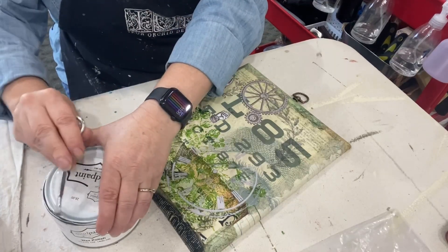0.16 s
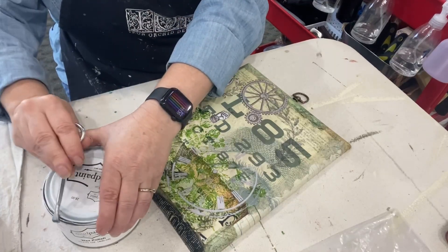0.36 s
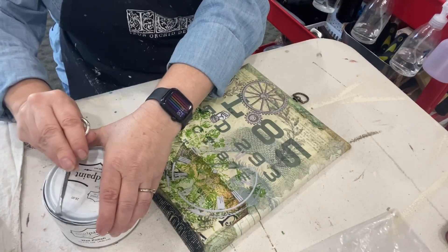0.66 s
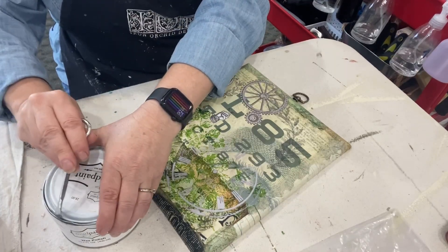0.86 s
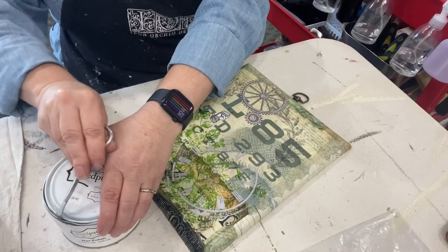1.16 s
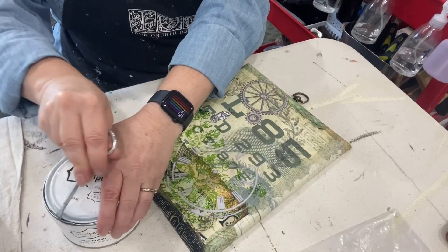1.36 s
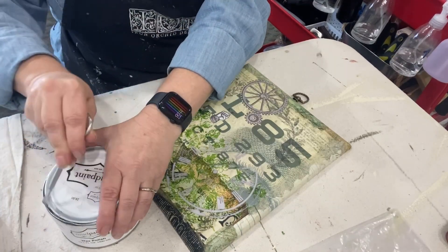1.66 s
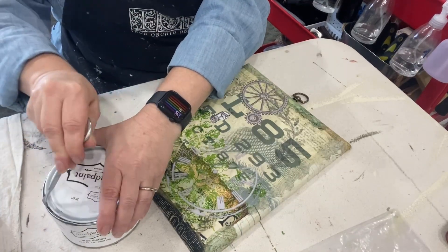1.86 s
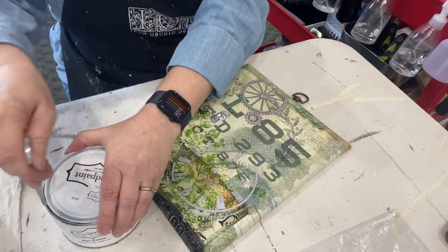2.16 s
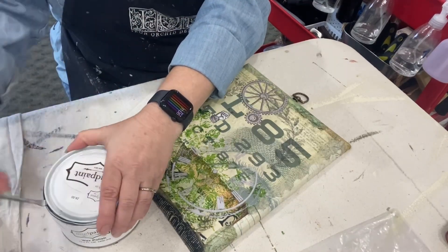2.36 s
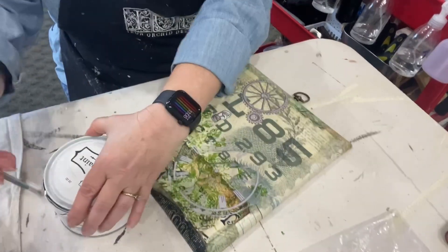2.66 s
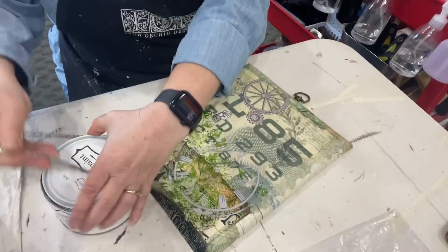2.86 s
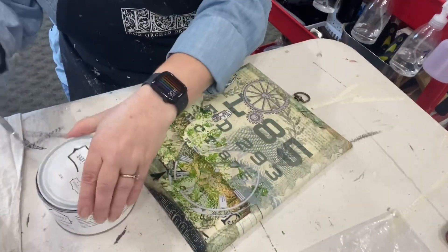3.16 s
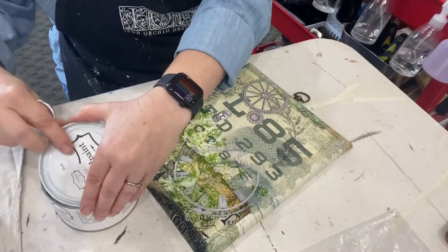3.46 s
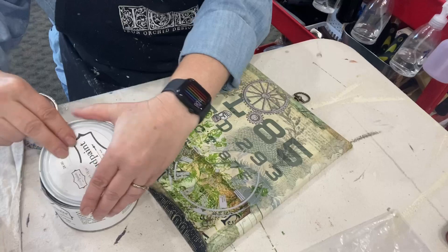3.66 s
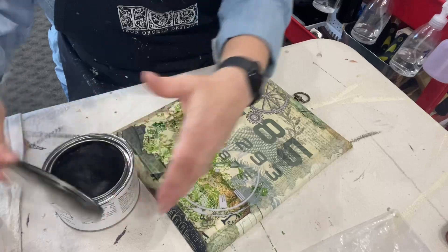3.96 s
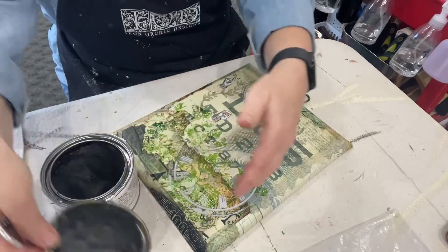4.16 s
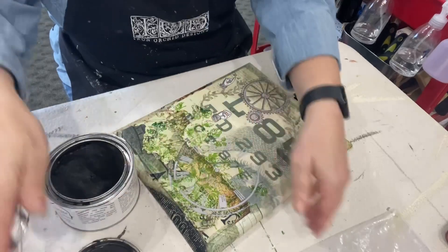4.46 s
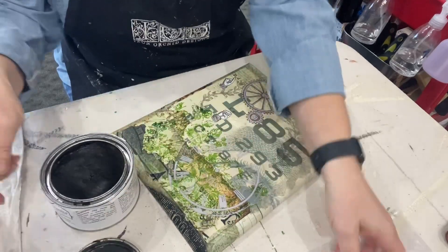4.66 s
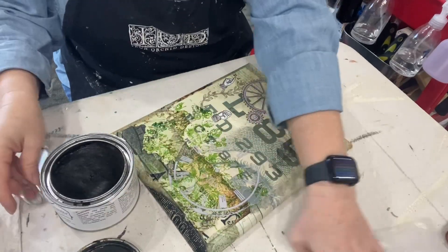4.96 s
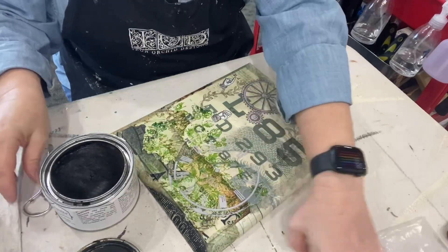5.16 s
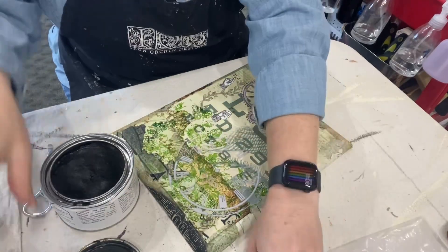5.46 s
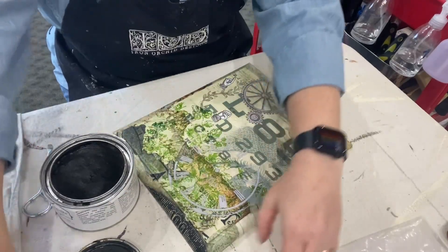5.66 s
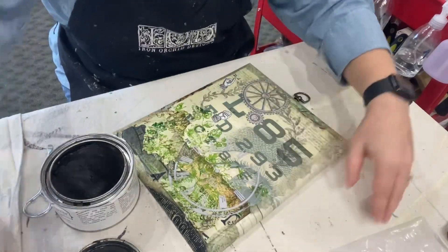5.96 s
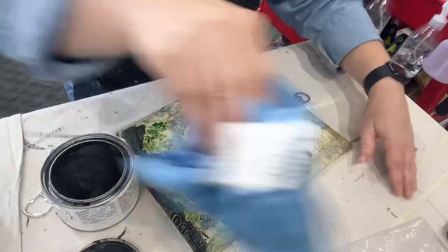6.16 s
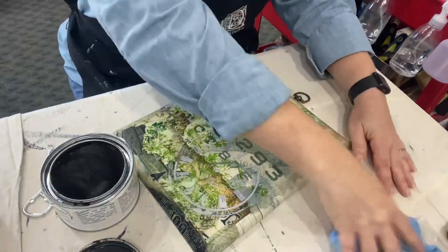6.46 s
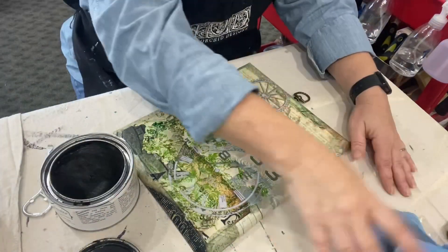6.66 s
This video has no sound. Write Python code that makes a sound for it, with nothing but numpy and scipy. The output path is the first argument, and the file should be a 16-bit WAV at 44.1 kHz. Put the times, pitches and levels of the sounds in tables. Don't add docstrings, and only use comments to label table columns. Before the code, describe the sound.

Light metallic knocks on a filled can, a hard levering pop, heavy set-downs on a tabletop, then faint bag crackle and a soft cloth thump.

```python
import sys
import numpy as np
from scipy import signal
from scipy.fft import rfft, irfft
from scipy.io import wavfile
from scipy.ndimage import uniform_filter1d

SR = 44100
rng = np.random.default_rng(int(sys.argv[2]) if len(sys.argv) > 2 else 0)


def dump(signal):
    limited = np.clip(np.atleast_2d(signal).T, -1, 1)
    pcm = np.round(limited * 32767).astype(np.int16)
    wavfile.write(sys.argv[1], SR, pcm)


def volts_from_decibels(level):
    exponent = np.asarray(level, float) / 20
    return 10 ** exponent


N = 299880


def unit(x):
    return x / np.sqrt(np.mean(x ** 2))


def peak(x, db):
    return x * volts_from_decibels(db) / np.max(np.abs(x))


def add(out, x, s):
    i = int(s * SR)
    out[..., i:i + x.shape[-1]] += x[..., :N - i]


def colour(x, shape):
    hz, db = np.transpose(shape)
    f = np.log(np.maximum(np.arange(x.shape[-1] // 2 + 1) * SR / x.shape[-1], 1))
    outside = np.maximum(np.log(hz[0]) - f, 0) + np.maximum(f - np.log(hz[-1]), 0)
    return irfft(rfft(x) * volts_from_decibels(np.interp(f, np.log(hz), db) - 11.4 * outside), x.shape[-1])


def moved_to(centre_hz, shape):
    return [(share * centre_hz, db) for share, db in shape]


def walk(rate):
    hold = int(SR / rate)
    levels = np.repeat(rng.standard_normal(N // hold + 1), hold)
    return 1.5 * uniform_filter1d(uniform_filter1d(levels, hold), hold)[:N]


def swells(peaks, rise_db_s, fall_db_s):
    s, db = (np.array(c)[:, None] for c in peaks)
    age = np.arange(0, N, 100) / SR - s
    return volts_from_decibels(db + np.minimum(rise_db_s * age, -fall_db_s * age))


def as_db(gain):
    return np.interp(np.arange(N), np.arange(0, N, 100), 20 * np.log10(gain))


def slips(rate, scatter_db):
    clicks = (rng.random(N) < rate / SR) * rng.standard_normal(N)
    return unit(clicks * volts_from_decibels(scatter_db * np.minimum(rng.exponential(size=N), 3)))


MODE_SCATTER_DB = 3


def ring(modes, chance, rise_s, spread):
    hz, db, t60 = (c[:, None] for c in np.transpose(modes))
    share, start, detune = chance[:3 * len(modes)].reshape(3, -1, 1)
    t = np.arange(int(SR * min(.8 * t60.max(), .5))) / SR
    fall, turn = np.log(1000) / t60, 2 * np.pi * hz * (1 + spread * detune)
    fall, turn, start, age = map(np.float32, (fall, turn, start, t))
    each = np.exp(-fall * age) * np.sin(turn * age + start)
    mixed = volts_from_decibels(db + MODE_SCATTER_DB * share)[:, 0] @ each
    return mixed * (1 - np.exp(-t / rise_s)) * (1 - 2 * t)


# (frequency [Hz], level [dB per Hz])
AIR_COLOUR = [(150, 13), (400, -6), (600, -7.5), (1500, -15.5), (3000, -21.5), (6000, -28.5), (9000, -27),
              (16000, -44)]
AIR_DB = -71


def room_air():
    noise = rng.standard_normal(N) + volts_from_decibels(-2) * rng.standard_normal((2, N))
    return unit(colour(noise, AIR_COLOUR)) * volts_from_decibels(AIR_DB + 4.0)


# (frequency [Hz], level [dB], t60 [s])
ECHO_BANDS = [(63, -13, 0.56), (113, -17, 0.55), (234.7, -16.5, 0.62), (500, -13.5, 0.63), (1000, -12, .38),
              (2400, -15, .35), (4100, -16.5, 0.24), (8000, -24.5, 0.2), (14000, -23.5, 0.072)]


def echoes():
    t, tail = np.arange(16384) / SR, 0
    for hz, db, t60 in ECHO_BANDS:
        shared, *apart = rng.standard_normal((3, len(t)))
        alike = min(max(160 / hz, hz / 7000), .97)
        noise = np.sqrt(alike) * shared + np.sqrt(1 - alike) * np.array(apart)
        noise = colour(noise, [(hz / 2, -9), (hz, 0), (hz * 2, -9)])
        tail = tail + volts_from_decibels(db) * noise * np.exp(-np.log(1000) * t / t60)
    return tail * np.clip(t / 0.00092, 0, 1) * volts_from_decibels(-23)


def room(x, size=16384):
    out, x = np.zeros((2, N + size)), np.pad(x, size // 2)
    patterns = [echoes() for _ in range(7)]
    for i in range(0, N, size // 2):
        piece = x[i:i + size] * np.hanning(size)[:len(x) - i]
        pattern = patterns[2 * i // size % len(patterns)]
        wet = signal.fftconvolve(piece[None], pattern, axes=1)[:, :N + size - i]
        out[:, i:i + wet.shape[1]] += wet
    return out[:, size // 2:N + size // 2]


# (frequency [Hz], phase [rad])
PORT_LEAD = [(0, 0), (690, 1.4), (1980, .6), (2670, 1.6), (4300, 1.0), (5800, 4.7), (9300, 7.85),
             (15400, 15.7)]
# (frequency [Hz], left minus right [dB])
PORT_SHADE = [(60, -4.5), (125, 0.5), (250, -4), (500, -0.5), (1000, -1.5), (2400, -2), (4400, -8.5),
              (5500, -8.5), (7000, -0.5), (9000, 2)]
DWELL = .46


def ports(x):
    f = np.arange(N // 2 + 1) * SR / N
    turn = np.interp(f, *np.transpose(PORT_LEAD))
    shade = np.log(volts_from_decibels(np.interp(f, *np.transpose(PORT_SHADE))))
    lead = 1j * (turn - DWELL * np.sin(2 * turn)) + shade
    return irfft(rfft(x) * np.exp(np.array([lead, -lead]) / 2), N)


# (frequency [Hz], level [dB per Hz])
RUMBLE_COLOUR = [(12, -60), (20, -42), (39, -15.5), (65, 3), (145, -12), (177, -15), (311, -29), (400, -29),
                 (520, -59), (880, -120)]
# (time [s], level [dB])
LEANS = [(.68, -58.5), (1.549, -66.5), (2.0, -48), (2.461, -76), (2.649, -41.5), (3.159, -55), (3.479, -49),
         (3.9, -52), (4.979, -66), (5.47, -55.5), (5.792, -51), (6.48, -46)]
LEAN_RISE_DB_S, LEAN_FALL_DB_S, REST_DB = 76, 54, -66.5


def rumble():
    lean = swells(np.transpose(LEANS), LEAN_RISE_DB_S, LEAN_FALL_DB_S).sum(axis=0) + volts_from_decibels(REST_DB)
    noise = unit(colour(rng.standard_normal(N), RUMBLE_COLOUR))
    return noise * volts_from_decibels(as_db(lean) + 1.6 * walk(12))


# (frequency [Hz], level [dB per Hz])
HISS_COLOUR = [(1500, -5.5), (3000, -3.5), (5000, -6.5), (8000, -1), (11000, -2.5), (13500, -4.5),
               (15500, -11.5)]
SCRAPE_COLOUR = [(200, -10.5), (450, 14), (1000, 3), (2000, -11.5), (3500, -32)]
# (time [s], hiss [dB], scrape re hiss [dB])
STROKES = [(.24, -99, 24), (1.38, -90, 9.5), (2.48, -71, -0.5), (3.04, -77, 0), (3.26, -80, -9.5),
           (3.68, -78, 7.5), (4.1, -78, -7), (4.2, -81, -13), (4.28, -83, 0), (4.56, -69.5, -11),
           (4.96, -64.5, 4.5), (5.3, -90.5, 27.5), (5.47, -64.5, -4), (5.72, -75.5, -1.5),
           (5.889, -74, -4.5), (6.302, -68.5, -6.5), (6.569, -80.5, 6.5)]
STROKE_RISE_DB_S, STROKE_FALL_DB_S, STILL_DB = 84, 88.5, -104


def rustle():
    s, hiss_db, scrape_db = np.transpose(STROKES)
    strokes = swells((s, hiss_db), STROKE_RISE_DB_S, STROKE_FALL_DB_S)
    hiss_gain = strokes.sum(axis=0) + volts_from_decibels(STILL_DB)
    scrape_gain = volts_from_decibels(scrape_db) @ strokes + volts_from_decibels(STILL_DB)
    grit = rng.standard_normal(N) + volts_from_decibels(-2.0) * slips(1700, 3.2)
    hiss = unit(colour(grit, HISS_COLOUR)) * volts_from_decibels(5.5 + 1.3 * walk(27))
    scrape = unit(colour(grit, SCRAPE_COLOUR)) * volts_from_decibels(as_db(scrape_gain / hiss_gain) + 1.6 * walk(26))
    return volts_from_decibels(as_db(hiss_gain) + 0.97 * walk(2.2)) * (hiss + scrape)


# (time [s], level [dB], start [Hz], end [Hz], length [s])
SQUEAKS = [
    (2.77, -44, 720, 560, .13),
    (3.15, -48, 400, 720, .06),
    (1.602, -44, 1385, 1375, .04),
    (1.662, -51, 1350, 1340, .04),
    (2.525, -54, 1840, 1850, .03),
]


def squeaks():
    out = np.zeros(N)
    for s, db, start_hz, end_hz, length in SQUEAKS:
        u = np.arange(int(length * SR)) / (length * SR)
        cycles = length * (start_hz * u + (end_hz - start_hz) * u ** 2 / 2)
        add(out, volts_from_decibels(db) * np.sin(np.pi * u) * np.sin(2 * np.pi * cycles), s)
    return out * (0.6 + walk(140))


# (time [s], crack peak [dB], top edge re crack [dB], body re crack [dB], crack centre [Hz])
TICKS = [(1.061, -66, -5, -20, 1800), (3.115, -60, 0.5, -20, 2800), (3.7, -66, 6, -20, 3000),
         (4.5108, -61, 7.5, -20, 4000), (4.5422, -62, 8, -20, 4000), (4.6085, -46.5, -6, -20, 4000),
         (4.6774, -55, 2.5, -20, 4000), (4.7749, -64, 7.5, -20, 4000), (4.813, -62, 10, -20, 4000),
         (4.8455, -57, 0, -20, 4000), (4.8909, -50, 0, -20, 3000), (4.9057, -48, 4, -20, 3500),
         (5.139, -50, 6, -20, 3500), (5.44, -52.5, 5.5, -20, 3000), (5.47, -52, 6, -20, 3000),
         (5.8455, -62, 3, -20, 3000), (5.88, -60, 3, -20, 4000)]
TICK_S = .0015


def ticks():
    return contacts([(*row, TICK_S) for row in TICKS], BAG_MODES[-1:], -3) + squeaks()


# (share of the centre, level [dB per Hz])
CHATTER_COLOUR = [(.4, -6.5), (.8, -0.5), (1.0, 4.5), (1.25, -3.5), (2.199, -20.5)]
# (time [s], rms level [dB], centre [Hz], top edge re chatter [dB], length [s])
DRAGS = [(0.215, -65.5, 2080, -21.5, 0.14), (1.05, -70.5, 404, -29, 0.11), (1.536, -54.5, 2390, -11, 0.096),
         (1.575, -51, 2500, -6, .11), (2.427, -45, 560, -22, 0.23), (2.651, -48, 1800, -4.5, .07),
         (2.716, -56, 640, 0.5, .12), (3.144, -59, 590, -30, 0.061), (2.988, -70, 4040, 5.5, .09),
         (3.057, -72, 2800, 1.5, 0.11), (3.43, -62, 2560, 4, 0.06), (3.757, -65, 1410, -1, .08),
         (4.239, -33, 700, -27, 0.034), (4.504, -69, 4000, 6, .07), (4.829, -65, 3500, 4, .08),
         (4.931, -63, 3000, 7.5, .1), (4.571, -56.5, 2975, 3.5, .1), (4.88, -61, 3060, 6, 0.11),
         (4.992, -41, 500, -33.5, 0.18), (5.267, -55, 1000, -5, 0.075), (5.4, -64, 2250, 4, 0.13),
         (5.535, -64.5, 2000, 2.5, .1), (6.42, -38, 3260, -5, 0.049), (6.428, -53, 600, -13, 0.047)]
SLIP_SCATTER_DB = 3.2


def drags():
    out, t = np.zeros(N), np.arange(16384) / SR
    chatter = slips(800, SLIP_SCATTER_DB) + 0.89 * rng.standard_normal(N)
    chatter = chatter * volts_from_decibels(2.0 * walk(60))
    for s, db, hz, top_db, length in DRAGS:
        piece = np.resize(chatter[int(s * SR):], len(t))
        grip = np.clip(np.minimum(t / 0.027, (length - t) / (0.46 * length)), 0, 1)
        body = unit(colour(piece, moved_to(hz, CHATTER_COLOUR)))
        top = volts_from_decibels(top_db) * unit(colour(piece, EDGE_COLOUR))
        add(out, volts_from_decibels(db) * grip * (body + top), s)
    return out


HELD = [(.228, -38, 2180), (.641, -33.5, 2380), (1.56, -31, 950), (1.559, -26.5, 2460), (1.649, -25, 1370),
        (1.915, -31.5, 620), (1.914, -26, 1750), (1.915, -24.5, 2387), (2.737, -20.5, 633),
        (3.401, -27, 740), (4.332, -19, 1050), (.689, -34.5, 1210)]
MORE_HELD = [(.229, -43, 750), (.308, -43, 664), (.308, -44, 2210), (.5, -45, 610), (.533, -49, 2150),
             (.688, -37.5, 582), (.688, -39, 2300), (1.583, -39, 2400), (1.569, -38, 2400), (1.594, -40, 700),
             (1.585, -42, 950), (1.56, -36, 600), (1.655, -40, 1700), (2.423, -32, 430), (2.489, -32, 580),
             (2.493, -44, 1850), (4.974, -24, 430), (4.252, -27, 1357), (4.252, -22, 900), (4.334, -27, 340),
             (3.025, -46, 400), (2.95, -48, 600), (3.115, -54, 950), (3.16, -54, 1100), (3.702, -50, 800),
             (4.798, -46, 1050), (.232, -46, 1400), (.312, -46, 1150), (.503, -50, 2250), (2.741, -28, 700),
             (6.437, -40, 2250), (6.452, -44, 2100), (4.342, -36, 1400), (6.434, -38, 900), (6.44, -36, 320),
             (1.65, -35, 2880), (2.468, -38, 606), (2.47, -49, 1800), (2.498, -47, 1300), (2.528, -50, 1850),
             (2.535, -41, 480), (2.558, -46, 1300), (2.565, -42, 560), (2.578, -44.5, 1350), (2.605, -43, 540),
             (2.634, -54, 1850), (2.7, -42, 1200), (2.736, -26, 1910), (2.737, -31, 2480), (2.737, -30, 1400),
             (2.784, -36, 470), (2.836, -42, 2550), (2.836, -45, 1320), (2.836, -36, 550), (4.962, -38, 960),
             (5.041, -28, 1050), (5.055, -37, 1650), (5.073, -26, 760), (5.1, -39, 700), (5.124, -34, 620),
             (5.15, -42, 700), (5.216, -45, 1700), (5.281, -48, 1400), (5.296, -48, 1104), (5.306, -48, 1090)]
FREE = [
    (.69, -65, 630),
    (1.917, -41.5, 565),
    (1.916, -43.5, 2570),
    (2.74, -41, 572),
    (3.403, -63, 592.6),
    (3.403, -33, 593.5),
    (4.252, -28.5, 608),
    (4.251, -33, 1200),
]
SKIN = [(1.654, -62, 1337), (1.917, -48, 1806), (1.917, -53, 2050), (1.917, -51, 2300), (1.917, -48, 2530),
        (1.917, -55, 840), (1.917, -49, 1755), (1.917, -54, 1572), (1.917, -50, 2239), (1.917, -48, 2460),
        (1.917, -58, 3736), (1.917, -55, 624), (2.74, -52, 1880), (4.976, -42, 540), (5.043, -50, 1350),
        (5.042, -50, 2560)]
ROCKS = [
    (1.6, -44, 66),
    (1.93, -40, 64),
    (2.445, -27, 62),
    (2.447, -34, 100),
    (2.5, -30, 60),
    (6.4685, -28, 68),
    (4.26, -28, 95),
]
THUDS = [
    (2.3785, -42, 330),
    (6.443, -27, 150),
    (6.4527, -16.5, 91),
]
SHAFT = [
    (1.2, -77, 3100),
    (3.528, -66.5, 3130),
    (3.531, -71, 2400),
]
# (frequency [Hz], level [dB], t60 [s])
OPENER_MODES = [(1750, -8.5, 0.013), (2560, -16, 0.012), (2720, -12, 0.014), (5840, -22, 0.017),
                (8200, -14, 0.0049), (4980, -71, 0.39), (7060, -58, 0.28), (6870, -61, 0.35)]
DROP_S = 5.0405
HELD_CYCLES, FREE_CYCLES, SKIN_CYCLES = 36, 270, 850
ROCK_CYCLES, THUD_CYCLES, SHAFT_CYCLES = 22, 7.5, 3000
WAVER_DB = 2.2


def rings():
    out, song, skin = np.zeros((3, N))
    groups = ((HELD_CYCLES, HELD + MORE_HELD, out, .0004), (FREE_CYCLES, FREE, out, .0004),
              (SKIN_CYCLES, SKIN, skin, .0004), (ROCK_CYCLES, ROCKS, out, .0004),
              (THUD_CYCLES, THUDS, out, .0004), (SHAFT_CYCLES, SHAFT, song, 0.047))
    for cycles, rows, into, rise_s in groups:
        for s, db, hz in rows:
            add(into, ring([(hz, db, cycles / hz)], np.zeros(3), rise_s, 0), s)
    add(out, ring(OPENER_MODES, np.zeros(3 * len(OPENER_MODES)), 0.00048, 0), DROP_S)
    waver, flutter = volts_from_decibels(WAVER_DB * walk(29.95)), walk(150)
    return out * waver + song * flutter + skin * (0.4 + flutter)


# (frequency [Hz], level [dB], t60 [s])
TABLE_MODES = [(53.2, -8.5, 0.53), (68, -6, 0.16), (98.4, -8, 0.34), (107.9, -8, 0.2), (148, 0, 0.084),
               (217.3, -12, 0.091), (260.9, -11, 0.13), (300.8, -10.5, 0.15), (378, -11, 0.053)]
# (time [s], peak [dB], centre [Hz], treble slope [dB per octave])
THUMPS = [(.226, -43.5, 279, -12), (.308, -47, 78, -8), (.497, -43, 81, -3.5), (0.686, -38, 256, -11.5),
          (1.596, -35, 144, -7.5), (1.65, -37, 75, -8), (1.917, -19, 148, -33), (1.983, -32, 103, -20.5),
          (2.379, -44.5, 100.3, -6), (2.4255, -15, 156, -24), (2.487, -25, 115.4, -10.5),
          (2.738, -21.5, 372, -30), (3.168, -47.5, 75.6, -28), (3.4, -24, 247, -16),
          (3.463, -36.5, 294, -11), (3.703, -40.5, 264, -10), (4.2518, -12.5, 148, -24),
          (4.332, -17.5, 140, -15.5), (4.697, -38.5, 142, -25.5), (4.851, -32, 128, -10),
          (4.978, -9.5, 287.7, -16), (5.032, -24.5, 279, -17.5), (5.074, -24.5, 160, -11.5),
          (5.124, -22.5, 221.7, -8.5), (5.702, -44.5, 132.5, -11.5), (5.849, -44, 100.4, -6),
          (6.4505, -40, 95, -28)]
DEEP_DB_PER_OCTAVE = 4
PANEL_DB, PANEL_DB_PER_OCTAVE = -6, -8


def table(late_s=.011):
    out, f = np.zeros(N), np.arange(4097) * SR / 8192
    arrival = np.clip((np.arange(8192) / SR - .02) / 0.0014, 0, 1)
    for s, db, hz, slope_db in THUMPS:
        top = [(hz * 0.45, -16), (hz, 0), (hz * 1.33, -9), (hz * 12, -20.5 + 3 * slope_db)]
        phase = 4 * np.pi * late_s * np.sqrt(f * hz) + 2 * np.pi * f * .02
        wave = colour(irfft(np.exp(-1j * phase)), top)
        add(out, peak(arrival * wave, db), s - .023)
        panel_db = PANEL_DB + PANEL_DB_PER_OCTAVE * np.log2(hz / 150)
        modes = [(m, d + DEEP_DB_PER_OCTAVE * min(np.log2(m / hz), 0), t60) for m, d, t60 in TABLE_MODES * 2]
        panel = ring(modes, rng.standard_normal(64), 0.0048, .07)
        add(out, peak(panel, db + panel_db), s + .004)
    return signal.sosfilt(signal.butter(2, 42, "high", fs=SR, output="sos"), out)


# (share of the centre, level [dB per Hz])
CRACK_COLOUR = [(.4, 4.5), (.7, -10.5), (1.0, 2.5), (1.4, -5.5), (2.4, -16)]
# (frequency [Hz], level [dB per Hz])
EDGE_COLOUR = [(4000, -9), (5500, -5.5), (8000, -5.5), (12000, -4.5), (16200, -11)]
EVEN_OUT = .4


def contacts(events, modes, pan_db):
    out, t = np.zeros(N), np.arange(2048) / SR
    for s, db, top_db, low_db, hz, length in events:
        chance = rng.standard_normal((3, 2048))
        age = np.maximum(t - .004, 0) / max(0.34 * length, .0003)
        tone = rfft(chance[:2] * age ** 1.88 * np.exp(-age))
        burst = irfft(tone / np.abs(tone) ** EVEN_OUT)
        crack = peak(colour(burst[0], moved_to(hz, CRACK_COLOUR)), db)
        edge = peak(colour(burst[1], EDGE_COLOUR), db + top_db)
        add(out, crack + edge, s - .0052)
        body = ring(modes * 6, chance[2], 0.00062, .12)
        add(out, peak(body, db + low_db - 1.5), s)
    return out * volts_from_decibels(np.array([[pan_db], [-pan_db]]) / 2)


# (frequency [Hz], level [dB], t60 [s])
TIN_MODES = [(306, -1.5, 0.039), (560, -10.5, 0.031), (588, 8, 0.044), (700, -7, 0.06), (811.6, -1, 0.057),
             (970, -18, 0.024), (1286, -10.5, 0.15), (1800, -29.5, 0.022), (2097, -9, 0.028)]
LID_MODES = [(340.3, 14, 0.015), (413, -10.5, 0.04), (545, -1, 0.04), (653, -2.5, 0.049), (871, 8, 0.013),
             (896, -9, 0.15), (1030, -13, 0.076), (1360, -3.5, 0.028), (1750, -23, 0.015)]
BAG_MODES = [(965, -5, 0.029), (1074, -9.5, 0.065), (1233, -22, 0.06), (2045, -1, 0.0046)]
SNAPS = [
    (5.323, -43.5, -19, -20),
    (5.4046, -45, 7.5, 4.5),
    (5.429, -43, 8, 5),
    (5.451, -41.5, -7.5, -6),
    (5.4598, -49.5, 10.5, 12),
    (5.5642, -56.5, -0.5, 10),
    (5.61, -54.5, -12, 1),
    (5.6258, -54.5, 6.5, 9.5),
    (5.7286, -61.5, 12, 17),
    (6.7914, -52.5, 2, 12.5),
]
LANDING = [
    (6.4237, -43, -11.5, -9.5),
    (6.4365, -29, -11, -11.5),
]
SETS = [(4.2507, -26.5, -22.5, 17.5, 1200), (4.332, -29.5, -54, 20.5, 1400), (4.558, -46.5, 9.5, -21, 2080),
        (4.5849, -42.5, -14, -28, 3200), (4.617, -43, 2, -4, 3020), (4.6271, -42, 6, -10, 3940),
        (4.799, -50, 8, 2, 4720), (4.8706, -48.5, 5.5, -23, 1300), (4.9128, -44, 12, -7, 3420),
        (4.9624, -32, -4, -17.5, 1350), (4.9744, -23, -12, -8, 2860), (4.9995, -36, -20, -10.5, 4360),
        (5.0112, -40, 0.5, 5.5, 3045), (5.042, -19, -1, -22.5, 1750), (5.0735, -33, -21.5, 14, 1200),
        (5.1245, -36, -14, 11.5, 3800), (5.1415, -35.5, -36, 3, 1360), (5.216, -47, 3.5, 9, 1720)]
TAPS = [(0.2283, -32, -24.5, -9, 0.0025), (0.3081, -39, -30, -3.5, 0.0016), (0.4993, -46.5, -12, 9, 0.0019),
        (.529, -50.5, -28, 4, 0.0059), (0.641, -31, -7, -3, 0.0013), (1.2488, -65.5, 7.5, -18, 0.0017),
        (1.5584, -28.5, -14, -8, 0.005), (1.915, -16.5, 3.5, -3, 0.0024), (0.6878, -30, -23, -2, 0.0019),
        (1.6492, -28, -10, -12, 0.0029), (2.376, -59, 9.5, 3, 0.0024), (2.4662, -52.5, -32.5, 12, 0.00096)]
PRIES = [
    (2.493, -40.5, -15.5, 14, 0.0058),
    (2.6595, -41, -18, 7, 0.0024),
    (2.6877, -26.5, -16, -33, 0.0045),
    (2.737, -21, -23.5, -2, 0.0056),
    (2.8354, -39, -20.5, 2, 0.002),
    (2.948, -58, 6, -3, 0.0029),
    (3.3989, -39.5, -15, 8.5, 0.0047),
    (3.426, -35, 8, 2, 0.0029),
    (3.4636, -39, -1.5, 11, .0023),
    (3.709, -82, -22, 36, 0.0032),
]
TAP_HZ, PRY_HZ, SNAP_HZ, LANDING_HZ = 2000, 1330, 1300, 2230
SNAP_S, SET_S = 0.0025, 0.0029
SET_SHORTENS = 0.15


def knocks():
    bag = [(*row, hz, SNAP_S) for hz, rows in ((SNAP_HZ, SNAPS), (LANDING_HZ, LANDING)) for row in rows]
    sets = [(*row, SET_S * volts_from_decibels(-SET_SHORTENS * (row[1] + 36.5))) for row in SETS]
    tin = [(*row[:4], hz, row[4]) for hz, rows in ((TAP_HZ, TAPS), (PRY_HZ, PRIES)) for row in rows]
    lid_and_bag = contacts(sets, LID_MODES, -3.0) + contacts(sorted(bag), BAG_MODES, -10.0)
    return contacts(sorted(tin), TIN_MODES, -1.3) + lid_and_bag


# (time [s], left minus right [dB])
HANDS = [(0, 1), (.8, 1), (1.2, -1), (1.6, 0), (2.2, 1), (3.2, 2), (3.7, 0), (4.3, 0), (5.0, .6), (5.6, 1),
         (6.2, 0), (6.8, 3)]


def scene():
    t = np.arange(N) / SR
    near, tones, cloth = knocks() + drags() + table(), rings(), rustle()
    pan_db = np.interp(t, *np.transpose(HANDS))
    direct = (near + tones + rumble() + cloth) * volts_from_decibels(np.array([pan_db, -pan_db]) / 2)
    send = volts_from_decibels(np.interp(t, [1.0, 4.0, 4.9, 5.3], [1.5, 2.0, -1.8, 1.0]))
    to_room = (near.mean(axis=0) + volts_from_decibels(-9.5) * tones) * send + volts_from_decibels(8.0) * cloth
    return ports(direct) + room_air() + room(to_room) + ticks()


def band_limit(x):
    return signal.sosfilt(signal.butter(12, 16300, fs=SR, output="sos"), x)


def record(dry):
    mix = np.tanh(1.26 * dry) / 1.348
    return band_limit(mix)


dry = scene()
out = record(dry)
dump(out)
```